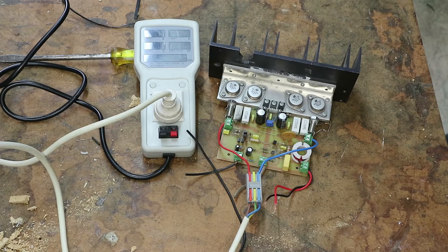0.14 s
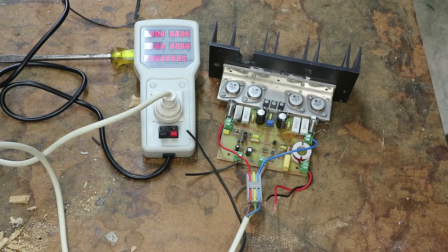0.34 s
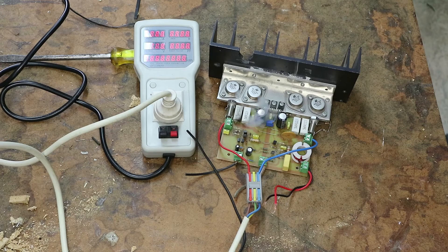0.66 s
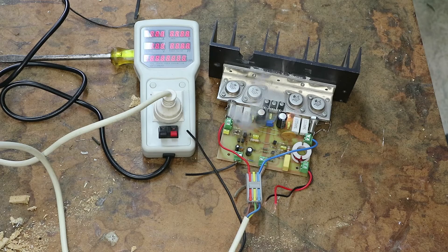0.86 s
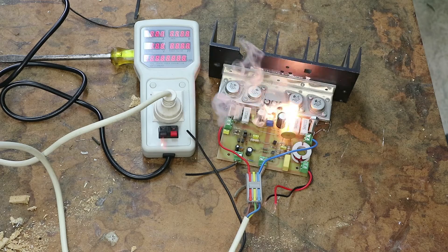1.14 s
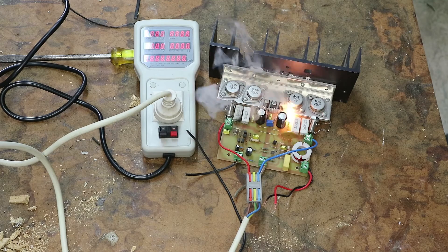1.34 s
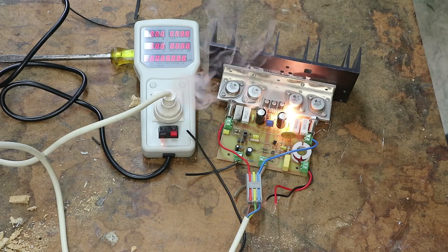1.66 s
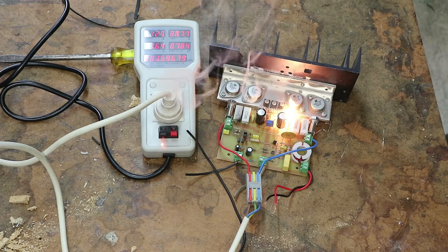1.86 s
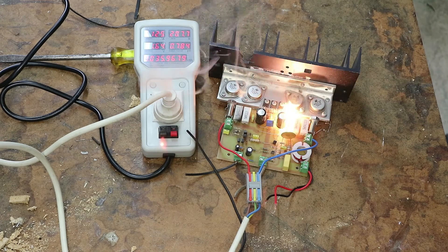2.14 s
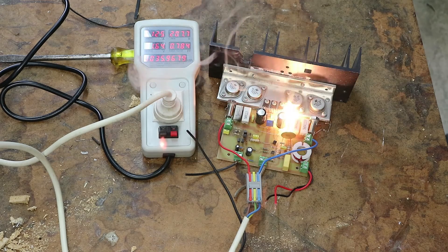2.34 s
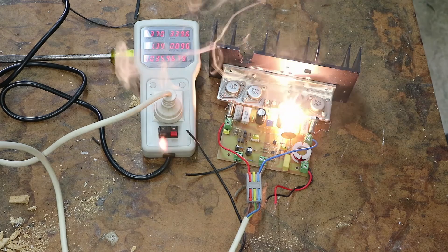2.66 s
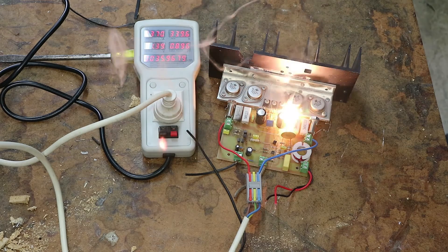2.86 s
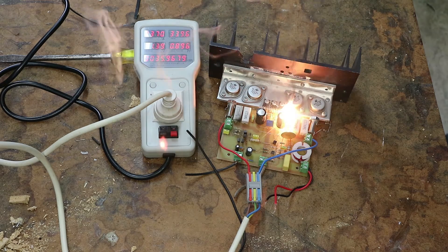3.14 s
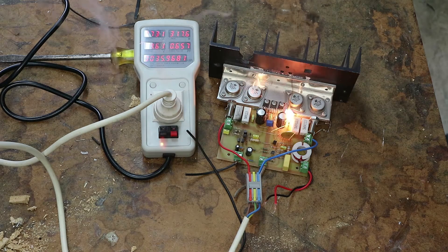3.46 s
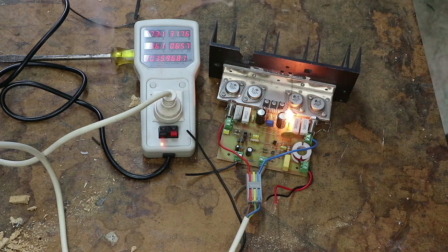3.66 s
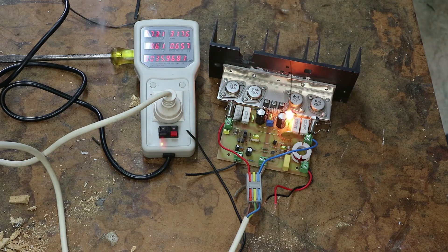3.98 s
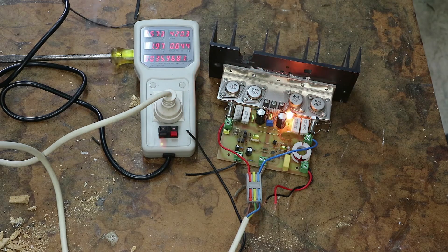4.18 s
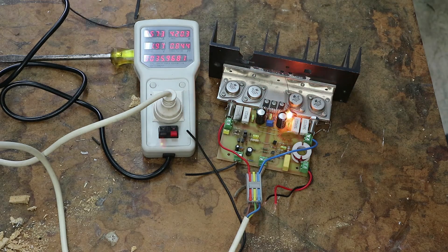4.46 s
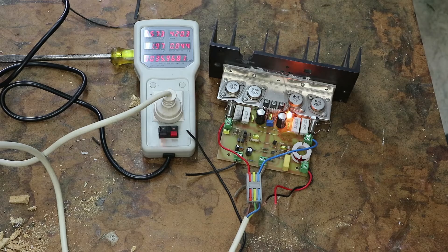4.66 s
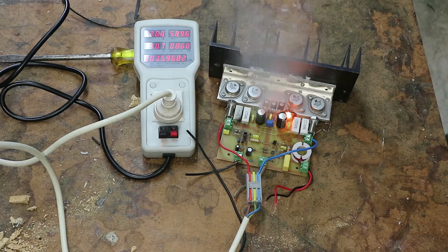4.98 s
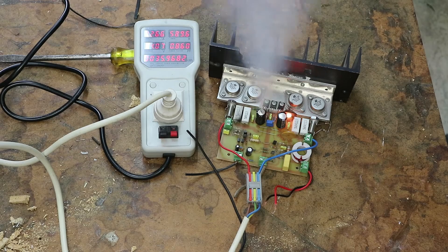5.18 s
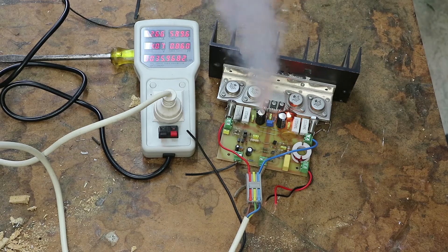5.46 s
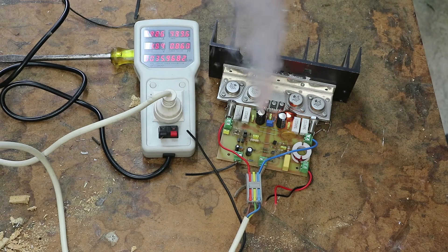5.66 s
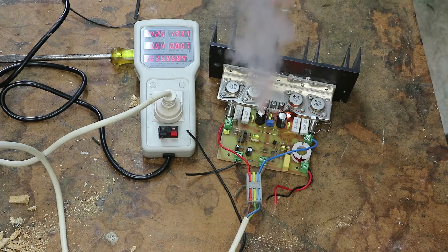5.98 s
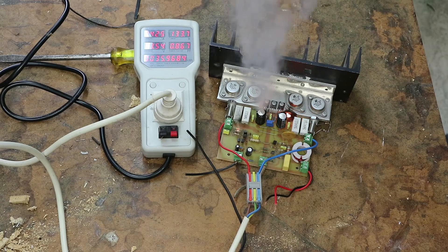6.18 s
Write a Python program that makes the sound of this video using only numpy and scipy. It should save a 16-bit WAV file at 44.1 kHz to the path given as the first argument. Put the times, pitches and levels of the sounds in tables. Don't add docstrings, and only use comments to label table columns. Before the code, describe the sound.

Electrical arcing pops and sizzles on a workbench, swells and dies; a faint whistle leads to one violent, clipped bang and a brief gas hiss.

```python
import sys
import numpy as np
from scipy import signal
from scipy.fft import rfft, irfft, next_fast_len
from scipy.io import wavfile
from scipy.ndimage import map_coordinates

SR = 44100
rng = np.random.default_rng(int(sys.argv[2]) if len(sys.argv) > 2 else 0)


def master_out(mix):
    frames = np.transpose(np.atleast_2d(mix))
    ceiling = np.clip(frames, -1, 1)
    pcm = np.round(ceiling * 32767).astype(np.int16)
    wavfile.write(sys.argv[1], SR, pcm)


def gain_from_db(level_db):
    decades = np.asarray(level_db, float) / 20
    return 10 ** decades


N = 278756
SPAN = SR // 2

# start in seconds, peak in dB, bubble in dB, crack in dB.
HARD_STRIKES = [(1.3695, -40, -8, -4.5), (1.45, -43.5, -6.5, -10), (1.4894, -37, -12, -16),
                (1.5284, -35, -20.5, -3), (1.6301, -38.5, -29, 1), (1.699, -34.5, -11, -1.5),
                (1.829, -38, -3.5, -4), (1.9898, -42.5, -9, -3), (2.0098, -30, -7.5, -4),
                (2.0293, -44, -1.5, -19), (2.1288, -39.5, -25, -1), (2.1509, -42.5, -25, -3),
                (2.268, -33, -6, -8), (2.2701, -34.5, -3.5, -11), (2.2898, -37.5, -29, -13),
                (2.3301, -27.5, -11.5, -8), (2.3687, -30.5, -24, -4.5), (2.37, -28.5, -26, -11),
                (2.5191, -40.5, -13, -6.5), (2.6329, -36, -14, -21), (2.6719, -27.5, -32, -13),
                (2.8305, -23.5, -7.5, -16), (2.8505, -14.5, -18.5, -8), (2.86, -39, -40, -19),
                (3.1285, -23.5, -19, 2), (3.1301, -32.5, -22, -3), (3.5303, -36.5, -27, -5)]
# start in seconds, peak in dB, bubble in dB, bubble pitch in Hz, crack in dB.
GULPS = [
    (1.229, -44, 11, 146, -6),
    (1.3069, -47, 2.5, 300, -6),
    (1.5069, -52, 10.5, 300, -6),
    (1.7293, -37.5, 4.5, 196, -5),
    (1.859, -51, 6, 300, 5),
    (2.2714, -39, 7.5, 300, 2),
    (2.6291, -32, -1, 300, 2),
    (2.7307, -35.5, 3.5, 496, -49),
]
# start in seconds, peak in dB, crack in dB.
SPITS = [(1.1662, -49, -6), (1.1877, -44, -9), (1.2083, -47, -7), (1.228, -41.5, -14), (1.298, -45, -18),
         (1.3478, -45, -22), (1.407, -53, -15), (1.547, -45, -14), (1.5687, -56, -3), (1.589, -41, -7),
         (1.608, -44, 2), (1.6775, -41, -6), (1.7018, -42, -16), (1.779, -44, -1), (1.8095, -44.5, -9),
         (1.987, -43, -11), (2.168, -42.5, -3.5), (2.2286, -43, -2), (2.429, -54, 8), (2.4791, -47, 2),
         (2.5586, -44, -1.5), (2.5793, -42.5, -4), (3.095, -47, -4), (3.181, -49, -11),
         (4.1827, -45.5, -12)]
# start in seconds, peak in dB.
TICKS = [
    (0.0712, -56.5),
    (1.1324, -55),
    (3.222, -47),
    (3.802, -54.5),
    (3.836, -58),
    (3.894, -56),
    (4.4118, -49),
    (6.2595, -51),
]


def strikes():
    pop_hz = 300
    hard = [(s, db, gas_db, pop_hz, crack_db, -2.5) for s, db, gas_db, crack_db in HARD_STRIKES]
    gulps = [(*row, -3) for row in GULPS]
    spits = [(s, db, -15, pop_hz, crack_db, -5) for s, db, crack_db in SPITS]
    ticks = [(s, db, -10, pop_hz, 7, -3) for s, db in TICKS]
    return hard + gulps + spits + ticks


def pops():
    out, t = np.zeros(N), np.arange(SPAN) / SR
    for s, db, bubble_db, bubble_hz, crack_db, room_db in strikes():
        noise = rng.standard_normal((2, SPAN))
        crack = push(t, 0.000025) + 0.2 * noise[0] * gain_from_db(-60 * t / 0.009)
        burning = t < 0.5 / bubble_hz
        sputter = np.convolve(noise[1], np.hanning(30) / 10, "same") * burning
        puff = push(t, 0.00012 * gain_from_db(-0.15 * crack_db))
        kick = puff + gain_from_db(crack_db + 7) * crack + gain_from_db(bubble_db - 1.5) * sputter
        snap = filtered(kick, bench)
        swell = gain_from_db(bubble_db - 14) * bubble(t - 0.0003, bubble_hz)
        walls_hz = 4530
        pop = echoed(snap + 0.35 * swell, room_db, dull_hz=walls_hz) + 0.58 * swell
        add(out, s, gain_from_db(db + 10.5) * pop)
    return out


def push(t, width):
    u = np.clip(t / width, 0, None)
    return -2 * u * (2 - u) * np.exp(-u)


def bubble(t, hz):
    u = np.clip(2 * hz * t, 0, None)
    fall = np.clip((u - 1) * 8, 0, 1)
    swelling = np.sin(1.7 * np.clip(u, 0, 1))
    suction = 1.3 * np.exp(-1.8 * np.clip(u - 1.1, 0, None))
    return (1 - fall) * swelling - fall * suction


# time in seconds, heat in dB.
FLAME = [
    (1.1, -8),
    (1.35, -5),
    (1.54, -0.5),
    (2.05, -2),
    (2.35, -1.5),
    (2.61, 0),
    (2.9, 0),
    (3.17, 3),
    (3.3, 5),
    (3.45, -7),
]
# frequency in Hz, level in dB per Hz.
ROAR = [(150, -16), (300, -3), (800, -1), (1100, -5.5), (1550, 4.5), (2100, -9), (3000, -8), (3800, -25),
        (6000, -68)]
FIZZ = [(1470, -22), (2500, 3), (2730, -26), (3630, -3), (4720, 5), (5530, -11), (6480, -0.5), (7180, -7),
        (9600, 1.5), (10600, -12), (13000, -16.5)]


def flame():
    mains_hz = 50
    t = np.arange(N) / SR
    heat_db = np.interp(t, *np.transpose(FLAME))
    roar_db = -57 + 1.96 * heat_db
    fizz_db = -62.5 + 0.8 * heat_db + np.interp(t, [1.44, 1.49], [-9, 0])
    turn = 2 * np.pi * mains_hz * (t - 0.009)
    beat = gain_from_db(5 * np.cos(2 * turn) + 0.8 * np.cos(turn) + 2.5 * wobble(40))
    alight = np.interp(t, [1.05, 1.2, 3.33, 3.45], [0, 1, 1, 0])
    sparks = [rng.standard_normal(N) * gain_from_db(2 * rng.exponential(size=N)) * beat for _ in range(2)]
    roar = gain_from_db(roar_db - 6) * coloured(sparks[0], ROAR)
    fizz = gain_from_db(fizz_db - 4.5) * coloured(sparks[1], FIZZ)
    half_cycle = SR // (2 * mains_hz)
    starts = np.arange(round(0.0088 * SR), N - half_cycle, half_cycle)
    jitter = rng.integers(-40, 40, len(starts))
    ticks = np.zeros(N)
    ticks[starts + jitter] = -gain_from_db(5 * rng.standard_normal(len(starts)))
    restrike = gain_from_db(fizz_db + 12) * filtered(np.convolve(ticks, np.hanning(5))[:N], bench)
    return echoed(alight * (roar + fizz + restrike), wet_db=-2)


# start in seconds, peak in dB, width in seconds.
BURST = [
    (5.1437, 5, .00008),
    (5.1442, 2, 0.000049),
    (5.1475, 3, 0.000088),
    (5.1510, 7, .00015),
    (5.1586, -2.5, 0.00013),
]
# frequency in Hz, level in dB per Hz.
JET = [(60, -13), (300, -2), (1300, 3.5), (1900, 2), (2800, -4), (5000, -11), (7500, -6), (10000, -11),
       (16000, -29)]


def capacitor():
    t = np.arange(N) / SR
    burst_s, leak_s, jump_s = BURST[0][0], 4.965, 5.062
    leak_db = -68 + 8.5 * (t - leak_s) + 5.5 * (t > jump_s)
    leaking = np.clip((t - leak_s) / 0.047, 0, 1) * (t < burst_s)
    whistle = leaking * gain_from_db(leak_db) * np.sin(2 * np.pi * 1217 * t)
    blast = sum(gain_from_db(db) * push(t - s, width) for s, db, width in BURST)
    shock = echoed(0.64 * blast + gain_from_db(3.5) * filtered(blast, bench), wet_db=-3)
    since = t - burst_s
    jet_fade = gain_from_db(0.5 - 60 * np.clip(since, 0, 1) / 0.07) * (since > 0)
    jet = jet_fade * coloured(rng.standard_normal(N), JET)
    heave = 1.15 * thump(since - 0.0003, hz=270, skew=0.63)
    return whistle + echoed(heave, wet_db=-19.5) + shock + echoed(jet, wet_db=-6.5)


def thump(t, hz, skew):
    return np.sin(2 * np.pi * np.clip(t * hz, 0, 1) ** skew)


# frequency in Hz, width in Hz, level in dB.
BENCH = [
    (300, 270, -8.5),
    (764.4, 660, -10),
    (1550, 460, -2.5),
    (2600, 1000, -13),
    (4700, 1100, -11.5),
    (7402, 1500, -17),
    (9460, 500, -15),
]


def bench(f):
    return sum(gain_from_db(db) * 1j * f * w / (c * c - f * f + 1j * f * w) for c, w, db in BENCH)


# frequency in Hz, time to fall by 60 dB in seconds.
ROOM = [(100, .2), (400, 0.22), (1500, 0.26), (5000, .3), (12000, .18)]


def echoed(x, wet_db, gap=0.0016, dull_hz=np.inf):
    hz, t, z = signal.stft(rng.standard_normal(SPAN), SR, nperseg=256)
    decay = gain_from_db(-60 * t / along(ROOM, hz)[:, None])
    tail = signal.istft(z * decay, SR, nperseg=256)[1][:SPAN]
    tail = tail * np.clip(np.arange(SPAN) / SR / gap - 1, 0, 1)
    keep = np.exp(-2 * np.pi * dull_hz / SR)
    tail = signal.lfilter([1 - keep], [1, -keep], tail / np.linalg.norm(tail))
    return x + gain_from_db(wet_db) * signal.fftconvolve(x, tail)[:len(x)]


# frequency in Hz, level in dB per Hz.
MURMUR = [(15, -25.5), (25, -4.5), (112, -1), (162, -4), (229, -5), (294, -2.5), (468, -2.5), (757, -2.5),
          (1230, -5), (1380, -5), (2500, -19), (3250, -44.5), (5500, -120)]


def building():
    swell_db = np.interp(np.arange(N) / SR, [1.1, 2.5], [0, 3])
    level_db = -67 + swell_db + 1.1 * wobble(1.5) + 0.8 * wobble(11)
    return gain_from_db(level_db) * coloured(rng.standard_normal(N), MURMUR)


def engine():
    t = np.arange(N) / SR
    since = t - 3.4
    hz = 72.3 + 7.5 * since
    stumble_db = -16 * np.exp(-((t - 4.035) / 0.04) ** 2)
    level_db = -73 + 11 * since + stumble_db
    passing = np.interp(t, [3.35, 3.45, 4.17, 4.25], [0, 1, 1, 0])
    return passing * gain_from_db(level_db) * np.sin(2 * np.pi * np.cumsum(hz) / SR)


def microphone(f):
    low, top = 1j * f / 110, 1j * f / 10500
    return low ** 2 / (1 + 2.64 * low + low ** 2) / (1 + 1.07 * top + top ** 2) ** 3


def ducking():
    since = np.clip(np.arange(N) / SR - 5.147, 0, None)
    left = 0.6 * np.exp(-since / 0.006) + 0.4 * np.exp(-since / 0.09)
    recovery_db = 10.5 * np.clip(since - 0.4, 0, None) ** 2
    return gain_from_db(-11 * (1 - left) + recovery_db)


def unit(x):
    return x / np.sqrt(np.mean(x ** 2) + 1e-20)


def along(points, hz):
    f, v = np.transpose(points)
    return np.interp(np.log(hz + 1), np.log(f + 1), v)


def wobble(rate):
    knots = rng.standard_normal(int(N * rate / SR) + 4)
    return map_coordinates(knots, [np.arange(N) * rate / SR])


def filtered(x, response):
    m = next_fast_len(len(x) + 8192)
    return irfft(rfft(x, m) * response(np.fft.rfftfreq(m, 1 / SR)), m)[:len(x)]


def coloured(x, spectrum):
    return unit(filtered(x, lambda hz: gain_from_db(along(spectrum, hz))))


def add(track, s, x):
    part = track[round(s * SR):][:len(x)]
    part += x[:len(part)]


def scene():
    mono = filtered(pops() + flame(), microphone) + capacitor() + building() + engine()
    return np.tile(mono, (2, 1))


def top_cut(x):
    return signal.sosfilt(signal.butter(12, 15900, fs=SR, output="sos"), x)


# frequency in Hz, level in dB per Hz.
HISS = [(880, -25.5), (1500, -3), (1880, -6), (2060, -4), (2270, -3.5), (3330, -4.5), (9080, -7),
        (14700, -6.5), (15800, -13.5)]
SIDE_HISS = [(18, -31.5), (30, -7.5), (71, -7.5), (226, 3.5), (326, -1), (446, 2), (1990, -10.5),
             (14200, -14.5), (15800, -17.5)]


def record(dry):
    gain = ducking()
    x = gain * (dry[0] + gain_from_db(-66.5) * coloured(rng.standard_normal(N), HISS))
    x = x / (1 + np.abs(x / 0.93) ** 6) ** (1 / 6)
    side = gain * gain_from_db(-62) * coloured(rng.standard_normal(N), SIDE_HISS)
    return top_cut(np.array([x + side, x - side]))


dry = scene()
out = record(dry)
master_out(out)
```